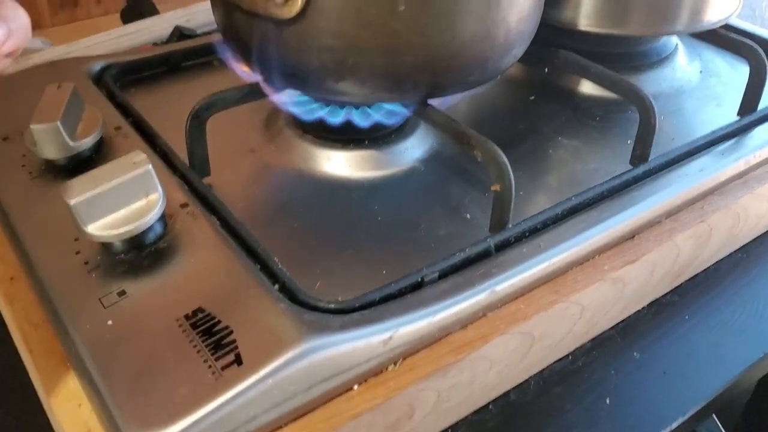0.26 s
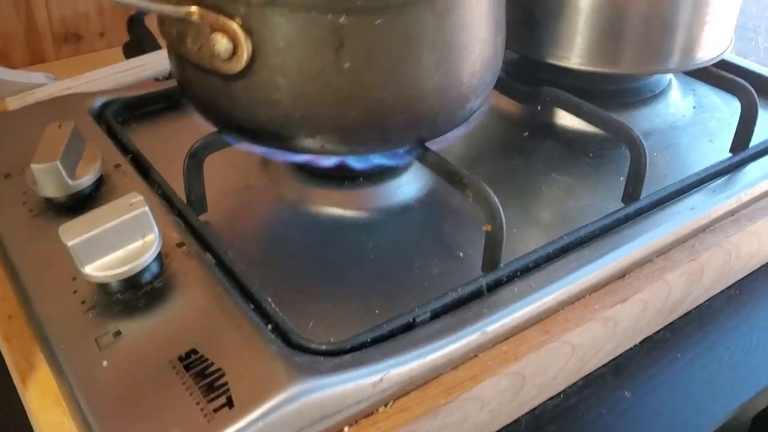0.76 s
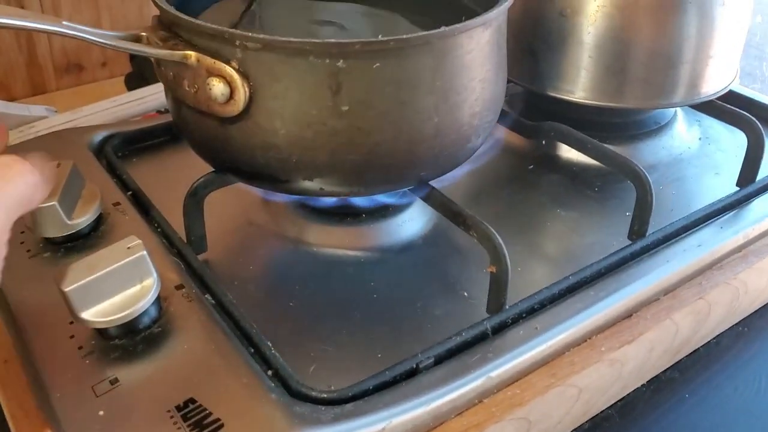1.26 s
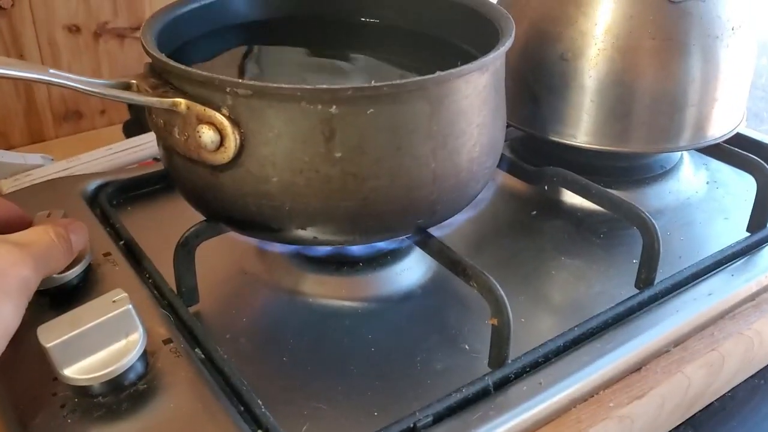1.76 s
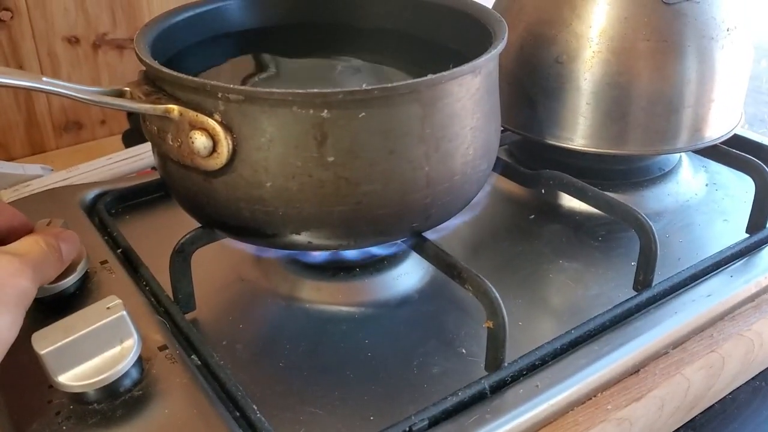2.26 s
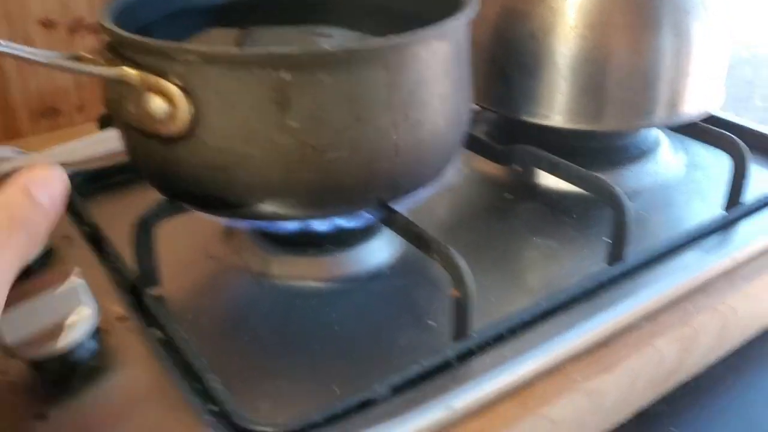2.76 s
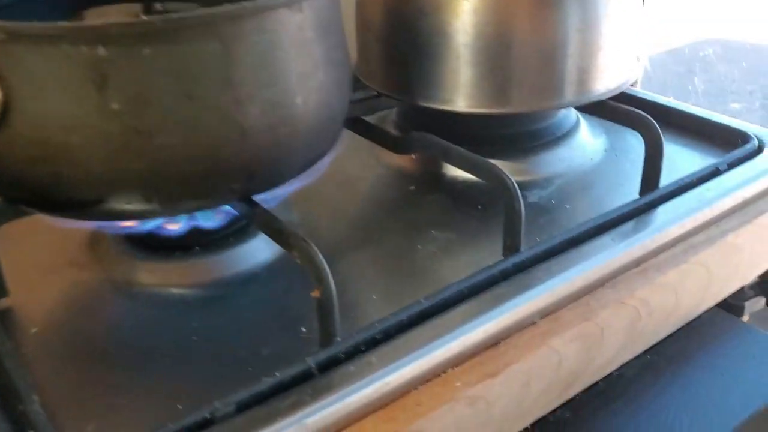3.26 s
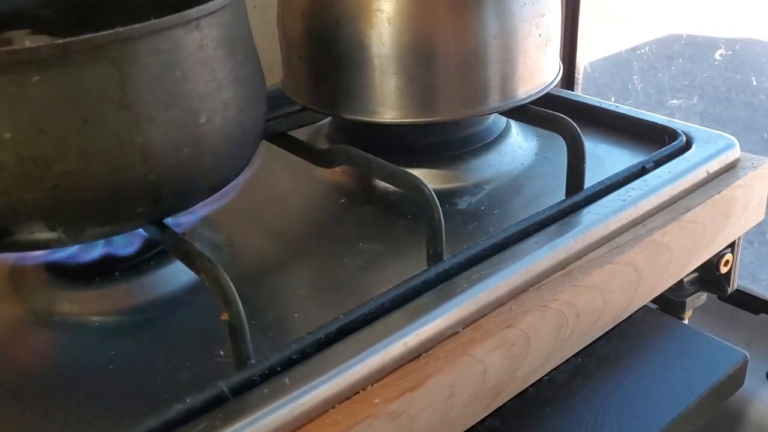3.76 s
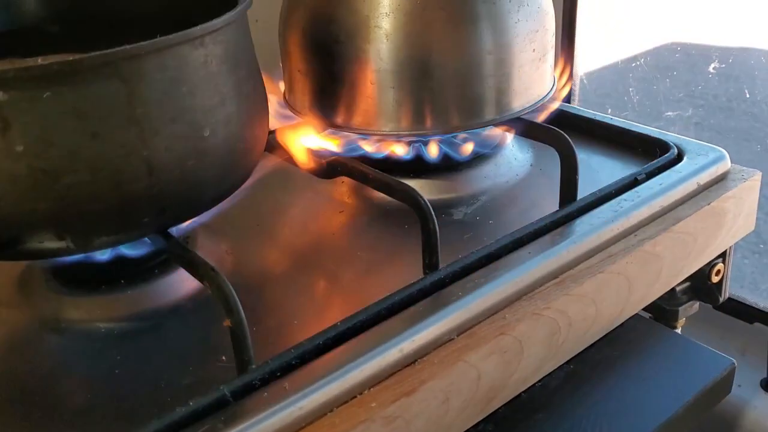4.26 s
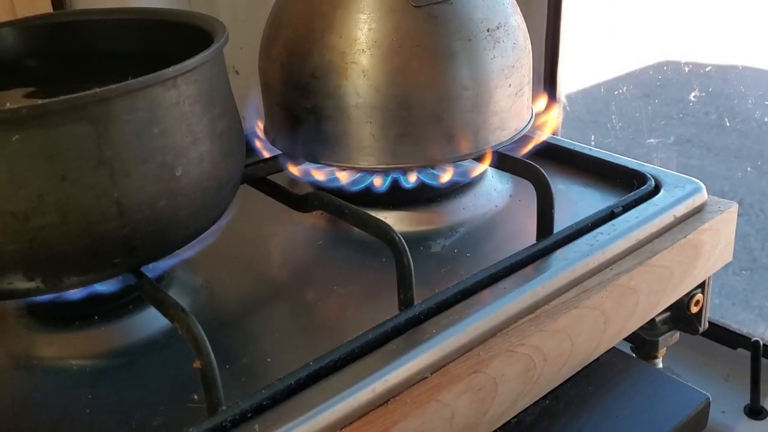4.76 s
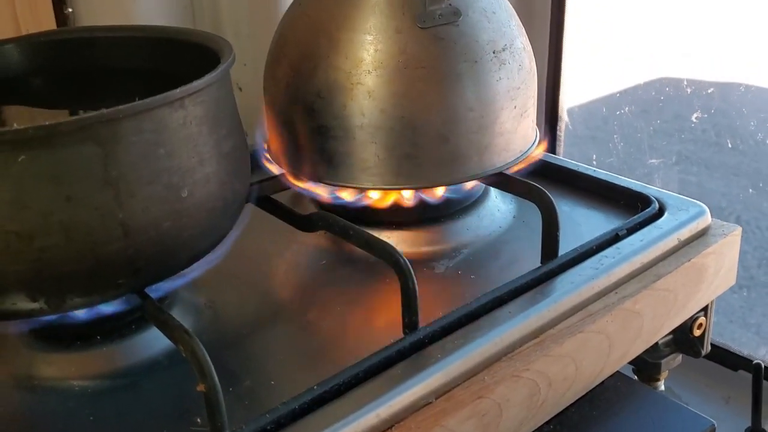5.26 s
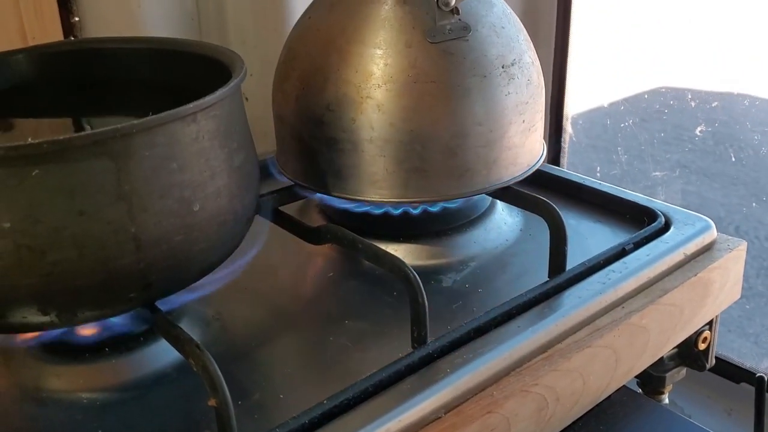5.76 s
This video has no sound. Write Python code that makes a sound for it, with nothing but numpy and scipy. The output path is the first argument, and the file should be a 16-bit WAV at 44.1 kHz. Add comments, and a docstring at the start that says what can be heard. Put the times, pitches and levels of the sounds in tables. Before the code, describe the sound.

Close, low gas flame rumble with a few knocks, followed by rapid sharp igniter clicks, hissing gas and a soft whoomp of ignition.

```python
"""At a small steel gas hob, close by. One ring burns under a pot: rumble, tube hiss, a flutter in a draught.
Knocks ring the steel top, pot and worktop; a faint hiss comes and goes. A second valve opens:
gas rushes through jet and mixing tube, the igniter snaps six times, and pooled gas catches
with a soft whoomp. The jet whistles briefly as the valve opens and again as it is turned down."""
import sys
import numpy as np
from scipy import signal
from scipy.fft import rfft, irfft, next_fast_len
from scipy.io import wavfile

SR = 44100
rng = np.random.default_rng(int(sys.argv[2]) if len(sys.argv) > 2 else 0)


def store_wav(level_fs):
    """Save 16-bit WAV to argv[1]."""
    pcm = np.round(np.clip(np.atleast_2d(level_fs), -1, 1) * 32767)
    wavfile.write(sys.argv[1], SR, pcm.T.astype(np.int16))


N = 264688
TIME = np.arange(N) / SR

# Flame and gas spectra. Each row: frequency in Hz, level in dB.
RUMBLE_SPECTRUM = [(20, -30.5), (31, -17), (42, -0.5), (70, 4), (100, -6), (150, -10), (230, -21),
                   (310, -22.5), (420, -39.5), (800, -41), (3000, -53)]
AIR_SPECTRUM = [(100, -14), (500, -7), (1300, -5.5), (2700, -6.5), (3800, -3), (5000, -11), (6000, -8),
                (7600, -1.5), (9100, 5.5), (9900, 1), (10400, -15.5), (13500, -5.5), (14500, -18.5),
                (15500, 3)]
FLUTTER_SPECTRUM = [(100, -5), (200, -3), (310, 2.5), (410, -15.5), (900, -18.5), (1200, -13.5),
                    (1450, -20.5), (1800, -15), (2300, -22), (2600, -33), (5000, -34.5), (6700, -28),
                    (8000, -37), (15000, -51.5)]
JET_SPECTRUM = [(500, -4.5), (1000, 9.5), (2500, -10.5), (4300, -2.5), (5100, -21), (6800, -3), (9000, -16),
                (11500, 3), (13500, -5), (15500, -12)]
WHOOMP_SPECTRUM = [(25, -18.5), (50, -11), (85, -2.5), (107, 1.5), (135, -6.5), (185, -7.5), (280, -18.5),
                   (420, -29), (560, -20), (800, -19), (1300, -27.5), (2200, -33), (4000, -39), (7000, -55),
                   (15000, -56.5)]
# Knock and spark spectra. Each row: frequency in Hz, level in dB.
PANEL_SPECTRUM = [(70, -4.5), (140, -15), (330, 4.5), (470, 0.5), (700, 3), (1150, -3.5), (1700, -2),
                  (2200, 0.5), (2600, -4.5), (3500, -6), (6000, -16), (12000, -47.5)]
CLICK_SPECTRUM = [(500, -14.5), (1500, 3), (2700, -6.5), (3600, 10), (5500, 0.5), (7500, 9), (10500, -0.5),
                  (15500, 4.5)]
WORKTOP_SPECTRUM = [(40, -11), (80, -6.5), (130, -1.5), (200, -8), (300, -8.5), (1000, -44.5)]
CRACK_SPECTRUM = [(350, -49.5), (700, -12.5), (1300, -19), (1900, -9.5), (2900, -12.5), (4800, -9.5),
                  (5900, -1.5), (6800, -4.5), (8000, -8), (10000, 2), (11500, -1.5), (14200, -2),
                  (15500, -4)]
ROOM_SPECTRUM = [(300, -29.5), (800, -20), (2000, -11), (4500, -6), (5800, -5.5), (6700, -2), (7500, -7),
                 (8600, -5.5), (10200, 0.5), (11300, -4), (15500, -8)]
# Resonances of the mixing tubes and the hollow hiss. Each row: centre in Hz, width in Hz, level in dB.
FIRST_TUBE_BANDS = [(1797, 75, 2), (3903, 95, -15), (5940, 200, -18), (9140, 500, -15)]
SECOND_TUBE_BANDS = [(943, 160, -3), (1089, 113, 8), (1580, 520, -17), (4280, 130, -14), (6760, 60, -10),
                     (11210, 60, -15.5), (11580, 300, -21.5), (13590, 60, -14)]
SWELL_BANDS = [(3973, 240, 7.5), (7550, 2600, -7)]
# Modes of steel top, pot, and burner cap with pan supports.
# Each row: frequency in Hz, level in dB, T60 in seconds.
STEEL_TOP_MODES = [(198.7, -9.5, 0.16), (227, -4.5, 0.19), (318.9, -3.5, 0.22), (392, -13.5, 0.15),
                   (563, -19, 0.022), (618, -11, 0.12), (717, -14.5, 0.21), (933, -13.5, 0.23),
                   (1046, -9, 0.11), (1120, -11.5, .14), (1355, -17, 0.055), (1410, -14.5, 0.12),
                   (1753, -18, .12), (1865, -16, 0.17), (2035, -6, 0.037), (2285, -16.5, 0.23),
                   (3270, -21, 0.16), (3370, -11, .12)]
COOKING_POT_MODES = [(2150, 5.5, 0.6), (2770, 3, 0.34)]
BURNER_MODES = [(3560, -12, .09), (4609, -7, .12), (5480, -6, .1), (6227, -1, .13), (6648, 0, .16),
                (7052, -3, .13), (7689, -6, .12), (9295, -5, .1), (9573, -5, .1), (9887, -4, .11),
                (10469, -3, .14), (12287, -5, .11)]
# Blows on hob and knob. Each row: start in seconds, level in dB, contact cut-off in Hz, thud in dB,
# click in dB, rattle length in seconds, pitch of the struck spot in Hz, worktop boom in dB.
BLOWS = [(0.242, -28, 3900, 2, -32.5, 0.036, 1080, -16), (1.026, -36.5, 1710, 2, -50, 0.013, 1820, -15.5),
         (1.355, -41.5, 910, 3.5, -18.5, 0.029, 770, -13), (2.860, -34.5, 1840, 3.5, 0.5, 0.01, 460, -7.5),
         (3.087, -40.5, 630, 7, -41.5, 0.038, 524, -1.5),
         (3.135, -27, 1900, -9.5, -13.5, 0.017, 1400, -6.5),
         (3.149, -28.5, 1700, -15.5, -5, 0.021, 1200, -6.5), (3.241, -41, 2000, -3.5, -17, 0.019, 1988, -2)]
# Hiss swells. Each row: peak time in seconds, half length in seconds, hollow hiss in dB, airy hiss in dB.
HISS_SWELLS = [(1.573, 0.27, -73.5, -80), (2.424, 0.24, -76.5, -66), (3.005, 0.043, -74, -62),
               (3.13, 0.29, -70.5, -75), (5.747, 0.79, -81.5, -78.5)]
# Sparks in turn. Each row: level in dB, low shelf in dB, left-right in dB, pitch the arc favours in Hz.
IGNITER_SPARKS = [(-16, 3, -2, 7100), (-12, 2, 1, 4300), (-16, 2.5, -2.5, 8300), (-15.5, 5, 1.5, 9800),
                  (-14.5, 0.5, -4.5, 11000), (-19, -2.5, -4.5, 9900)]
# Jet tones. Each row: start in seconds, hold in seconds, starting pitch in Hz, level in dB.
JET_TONES = [(3.76, .07, 11500, -61.5), (5.169, 0.067, 11350, -55), (5.166, 0.074, 7400, -75)]
# Flares of pooled gas. Each row: start in seconds, hold in seconds, level in dB.
GAS_FLARES = [(3.909, 0.16, -28.5), (4.424, 0.031, -49.5)]
# Likeness of the two sides. Each row: frequency in Hz, correlation.
STEREO_CORRELATION = [(30, 0.91), (125, 0.97), (250, 0.75), (500, 0.4), (1000, 0.51), (2000, 0), (16000, 0)]
# Stereo balance. Each row: frequency in Hz, left-right in dB.
STEREO_BALANCE = [(500, -0.5), (1000, 2), (1600, -4), (2100, -1), (2750, 3.5), (3400, 4.5), (4400, 2.5),
                  (5100, 5), (5800, 9), (6700, 13), (7700, 3), (9000, 1.5), (13200, 5), (15500, -0.5)]


def from_db(db):
    """Decibels to gain."""
    return 10 ** (np.asarray(db) / 20)


def unit_rms(x):
    """Scale to unit power."""
    return x / np.sqrt(np.mean(x ** 2) + 1e-20)


def at_hz(points, hz):
    """Interpolate on a log-frequency axis."""
    points_hz, values = np.transpose(points)
    return np.interp(np.log(hz + 1), np.log(points_hz), values)


def bins_hz(size):
    """Frequencies of a real FFT."""
    return np.arange(size // 2 + 1) * SR / size


def colour(x, spectrum):
    """Minimum-phase filter; white noise keeps its power."""
    size = next_fast_len(x.shape[-1] // 2 + 2048, True) * 2
    gain = unit_rms(from_db(at_hz(spectrum, bins_hz(size))))
    cepstrum = irfft(np.log(gain))
    cepstrum[1:size // 2] *= 2
    cepstrum[size // 2 + 1:] = 0
    return irfft(rfft(x, size) * np.exp(rfft(cepstrum)))[..., :x.shape[-1]]


def diffuse(size):
    """White stereo noise, correlated below 2 kHz."""
    padded = next_fast_len(size // 2 + 1, True) * 2
    mid, side = rfft(rng.standard_normal((2, padded)))
    alike = at_hz(STEREO_CORRELATION, bins_hz(padded))
    return irfft(np.sqrt((1 + alike) / 2) * mid + np.sqrt((1 - alike) / 2) * side * [[1], [-1]])[:, :size]


def drift(rate_hz):
    """Random wander, unit RMS."""
    knots = rng.standard_normal(4096)
    return unit_rms(np.interp(TIME * rate_hz, np.arange(len(knots)), knots))


def low_pass(x, hz, order=2):
    """Butterworth low-pass."""
    return signal.sosfilt(signal.butter(order, hz, fs=SR, output="sos"), x)


def band(x, hz, width_hz):
    """One resonance, unit peak gain."""
    return signal.lfilter(*signal.iirpeak(hz, hz / width_hz, fs=SR), x)


def ramp(start_s, length_s):
    """Linear move from 0 to 1."""
    return np.clip((TIME - start_s) / length_s, 0, 1)


def envelope(start_s, attack_s, hold_s, t60_s):
    """Rise, hold, exponential decay."""
    fall_db = -60 * np.clip((TIME - start_s - attack_s - hold_s) / t60_s, 0, 2)
    return ramp(start_s, attack_s) * from_db(fall_db)


def pan(side_db):
    """Channel gains for a left-right difference."""
    return from_db(np.array([[side_db], [-side_db]]) / 2)


def add(out, start_s, sound):
    """Mix a sound in."""
    at = round(start_s * SR)
    out[:, at:at + sound.shape[1]] += sound[:, :N - at]


def tube_hiss(resonances, treble_gain=1):
    """Gas turbulence rings in a tube's resonances; unit RMS."""
    turbulence, out = diffuse(N), 0
    for hz, width_hz, db in resonances:
        gain = from_db(db) * (treble_gain if hz > SR / 8 else 1)
        out += gain * band(band(turbulence, hz, 2 * width_hz), hz, 2 * width_hz)
    return unit_rms(out)


def first_ring(throb_db=1, waver_db=1.1, settle_s=0.99):
    """A flame rumbles and flutters once in a draught; its tube hiss builds as it settles."""
    away = ramp(start_s=2.26, length_s=1)   # listener moves to the second ring
    rumble_db = -49 - 4.5 * away - throb_db * drift(17)
    rumble = from_db(rumble_db) * colour(diffuse(N), RUMBLE_SPECTRUM)
    tube_db = -78 + 9 * ramp(0, settle_s) - 6.5 * away + waver_db * drift(21)
    hiss = from_db(tube_db) * tube_hiss(FIRST_TUBE_BANDS)
    draught = envelope(start_s=0.33, attack_s=0.16, hold_s=0.26, t60_s=0.54)
    flutter = draught * from_db(-48) * colour(diffuse(N), FLUTTER_SPECTRUM)
    air = from_db(-68) * colour(diffuse(N), AIR_SPECTRUM)
    return rumble + hiss + flutter + air


def struck_metal(modes, t, rattle_s, uneven_db=7.5):
    """Modes swell during contact, then ring down; each blow weights them anew."""
    swell = np.sqrt(np.minimum(t / (rattle_s / 2), 1))
    out = 0
    for hz, db, t60_s in modes:
        phase, strength, apart = rng.standard_normal(3)
        side_rad = apart * (1 - at_hz(STEREO_CORRELATION, hz)) * np.array([[1], [-1]])
        fall_db = -60 * np.maximum(t - rattle_s / 2, 0) / t60_s
        tone = np.sin(2 * np.pi * (hz * t + phase) + side_rad)
        out += from_db(db + uneven_db * strength + fall_db) * swell * tone
    return out


def knocks(panel_t60_s=0.22, click_t60_s=0.15, boom_t60_s=0.16, pot_db_per_octave=19):
    """Blows rattle the steel top and click; top, pot and worktop ring on."""
    out, t = np.zeros((2, N)), TIME[:SR // 2]
    rise = np.minimum(t / 0.0072, 1)
    for start_s, db, contact_hz, thud_db, click_db, rattle_s, spot_hz, boom_db in BLOWS:
        after_s = np.maximum(t - rattle_s, 0)
        panel = colour(diffuse(len(t)) * rise * from_db(-6 - 60 * after_s / panel_t60_s), PANEL_SPECTRUM)
        panel += from_db(-1) * struck_metal(STEEL_TOP_MODES, t, rattle_s, uneven_db=0.5)
        panel += band(panel, spot_hz, width_hz=0.14 * spot_hz)
        panel += (from_db(thud_db) - 1) * low_pass(panel, hz=450, order=1)
        panel = low_pass(panel, contact_hz)   # soft contact, less treble
        strike = from_db(-5 - 60 * after_s / click_t60_s) + from_db(-60 * t / 0.025)
        click = from_db(click_db) * colour(diffuse(len(t)) * strike, CLICK_SPECTRUM)
        boom = colour(diffuse(len(t)) * from_db(boom_db - 60 * after_s / boom_t60_s), WORKTOP_SPECTRUM)
        pot_db = -24.5 + pot_db_per_octave * np.log2(contact_hz / 3960)   # hard contact, more ring
        pot = from_db(pot_db) * struck_metal(COOKING_POT_MODES, t, rattle_s)
        add(out, start_s, from_db(db) * (panel + click + boom + pot))
    return out


def hiss_swells():
    """A faint hiss, part hollow and part airy, comes and goes."""
    hollow, airy = tube_hiss(SWELL_BANDS), colour(diffuse(N), AIR_SPECTRUM)
    out = 0
    for peak_s, half_s, hollow_db, airy_db in HISS_SWELLS:
        bump = np.exp(-np.minimum(((TIME - peak_s) / half_s) ** 2, 20))
        out += bump * (from_db(hollow_db) * hollow + from_db(airy_db) * airy)
    return out


def sparks(first_s=3.2096, period_s=0.2335, crack_s=0.0036, rise_s=0.00042, scatter_t60_s=0.012,
           early_t60_s=0.05, room_t60_s=0.17, spiky_db=4, shelf_hz=8200, right_lag_s=0.00015):
    """Each arc cracks and scatters between hob and pots; burner and room ring after it."""
    out, t = np.zeros((2, N)), TIME[:SR // 3]
    scatter_db = np.where(t < crack_s, -2.5 * t / crack_s, -9 - 60 * (t - crack_s) / scatter_t60_s)
    early_echoes = from_db(-5 - 60 * t / early_t60_s) * (t > crack_s)
    crack_gain = (from_db(scatter_db) + early_echoes) * np.minimum(t / rise_s, 1)
    room_gain = from_db(-25.5 - 60 * t / room_t60_s) * np.minimum(t / 0.005, 1)
    high_pass = signal.butter(3, shelf_hz, "high", fs=SR, output="sos")
    # echo paths shared by all sparks
    paths = unit_rms(rng.standard_normal((2, len(t))) * from_db(spiky_db * rng.standard_normal(len(t))))
    walls = diffuse(len(t))
    for k, (db, shelf_db, side_db, focus_hz) in enumerate(IGNITER_SPARKS):
        crack = colour((0.75 * paths + 0.65 * diffuse(len(t))) * crack_gain, CRACK_SPECTRUM)
        room = colour(0.7 * (walls + diffuse(len(t))) * room_gain, ROOM_SPECTRUM)
        metal = from_db(-25.5) * struck_metal(BURNER_MODES, t, crack_s, uneven_db=-2)
        snap = (from_db(db) * (crack + metal) + room) * pan(side_db)
        snap += from_db(-6) * band(snap, focus_hz, width_hz=900)
        snap = signal.sosfilt(high_pass, snap) + from_db(shelf_db) * low_pass(snap, shelf_hz, order=3)
        snap[1] = np.interp(t - right_lag_s, t, snap[1], left=0)
        add(out, first_s + k * period_s, snap)
    return out


def second_ring(open_s=3.4, turn_down_s=5.138, low_flow=0.27, waver_db=1.7):
    """Gas rushes through jet and tube; valve flow sets both levels and the tube's brightness."""
    turned_down = ramp(turn_down_s, length_s=0.156)
    flow = ramp(open_s, length_s=0.4) * (1 - (1 - low_flow) * turned_down)
    jet_gain = flow ** 2
    roar = flow * from_db(-59 + waver_db * drift(23)) * tube_hiss(SECOND_TUBE_BANDS, jet_gain)
    jet = jet_gain * from_db(-64.5) * colour(diffuse(N), JET_SPECTRUM)
    return pan(side_db=-2) * (roar + jet + jet_whistles())


def jet_whistles(sag_hz_per_s=3000, waver_hz=50, flicker_db=3.5):
    """The jet sings thin, unsteady tones that sag in pitch."""
    out = 0
    for start_s, hold_s, start_hz, db in JET_TONES:
        hz = start_hz - sag_hz_per_s * np.clip(TIME - start_s, 0, 1) + waver_hz * drift(300)
        gate = envelope(start_s, attack_s=0.043, hold_s=hold_s, t60_s=0.14)
        rms = from_db(db + flicker_db * drift(74)) * gate
        out += np.sqrt(2) * rms * np.sin(2 * np.pi * np.cumsum(hz) / SR)
    return out


def whoomp(ragged_db=1.5, tongues_per_s=220, attack_s=0.025, t60_s=0.11):
    """The flame front tears through pooled gas in ragged tongues."""
    burn = unit_rms(diffuse(N) * from_db(ragged_db * drift(tongues_per_s)))
    flares = sum(from_db(db) * envelope(start_s, attack_s, hold_s, t60_s)
                 for start_s, hold_s, db in GAS_FLARES)
    return colour(burn * flares, WHOOMP_SPECTRUM)


def scene():
    """Both rings, hiss swells, ignition, knocks and igniter."""
    return first_ring() + second_ring() + hiss_swells() + whoomp() + knocks() + sparks()


def record(dry, ceiling=1.2, cutoff_hz=15800):
    """Colour the two sides differently, round the peaks, cut the top."""
    size = next_fast_len(N // 2 + 1024, True) * 2
    balance = from_db(at_hz(STEREO_BALANCE, bins_hz(size)) * np.array([[0.5], [-0.5]]))
    coloured = irfft(rfft(dry, size) * balance)[:, :N]
    rounded = ceiling * np.tanh(coloured / ceiling)
    return signal.sosfilt(signal.ellip(12, 0.2, 80, cutoff_hz, fs=SR, output="sos"), rounded)


dry = scene()
out = record(dry)
store_wav(out)
```